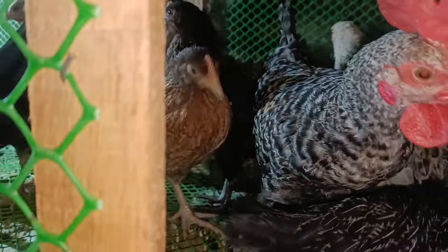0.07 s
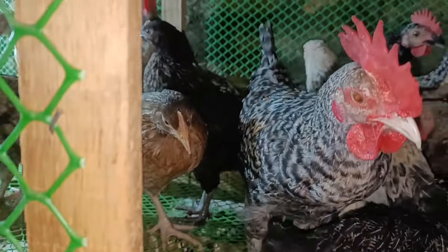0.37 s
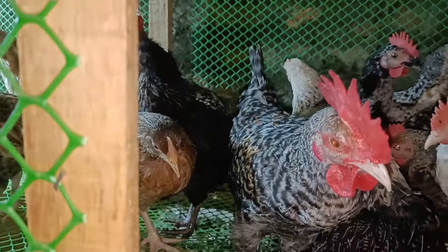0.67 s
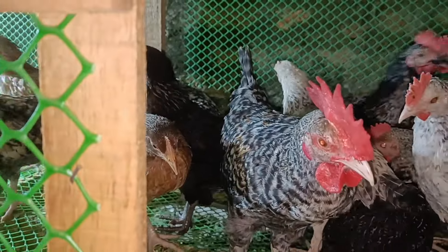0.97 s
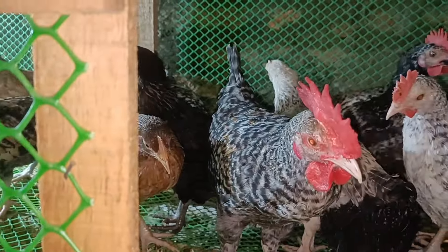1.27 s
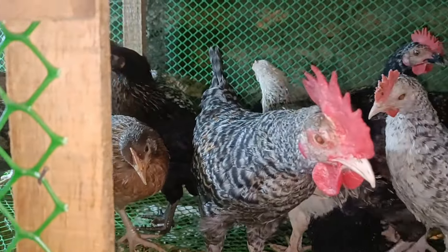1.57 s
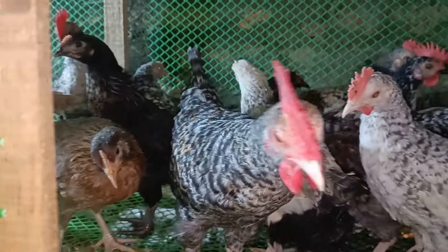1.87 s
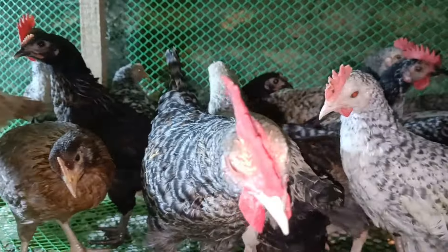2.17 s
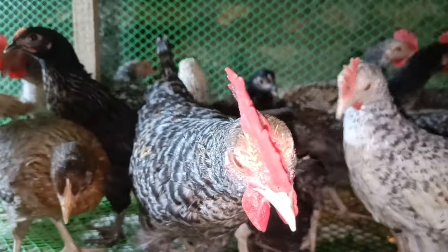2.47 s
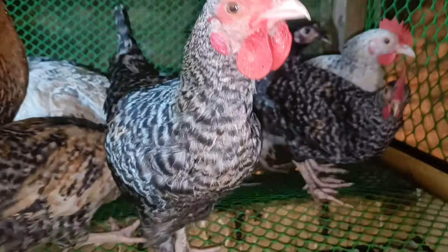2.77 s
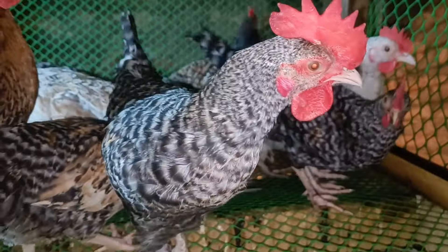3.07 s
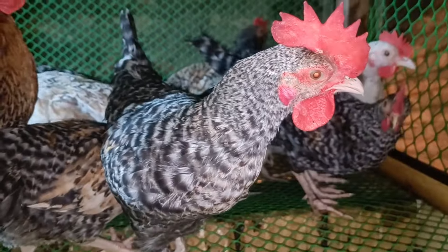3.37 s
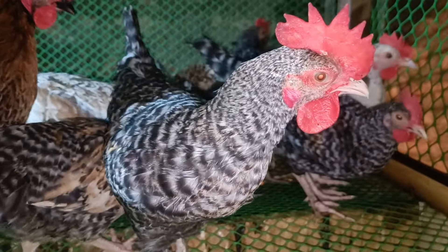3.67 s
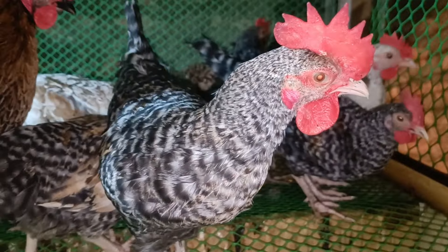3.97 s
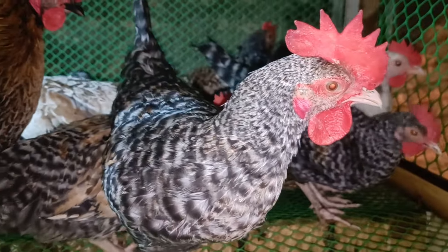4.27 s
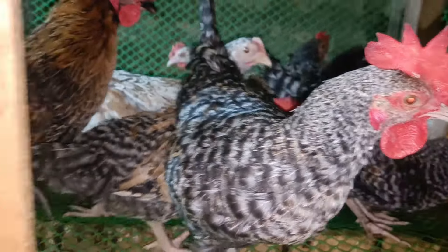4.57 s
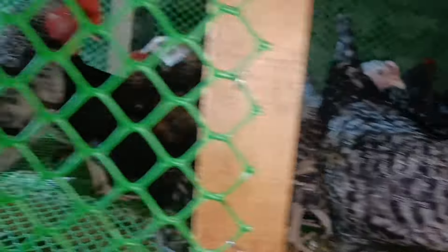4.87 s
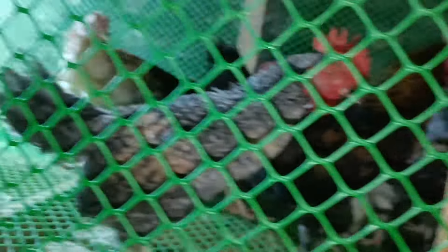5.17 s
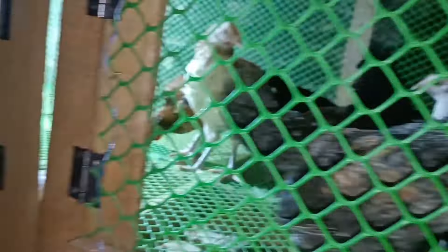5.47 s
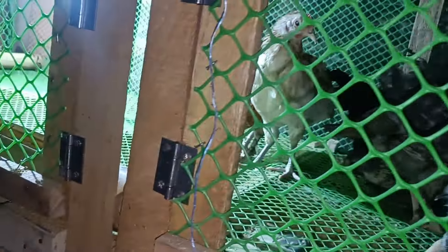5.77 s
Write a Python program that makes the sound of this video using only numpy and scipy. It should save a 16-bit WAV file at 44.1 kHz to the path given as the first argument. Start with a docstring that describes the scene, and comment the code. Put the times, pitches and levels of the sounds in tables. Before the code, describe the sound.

In a small, crowded coop, a chicken close to the microphone gives a loud squawk in three parts: a short note, a long held one and a raspy ending. Young birds then keep up quieter falling peeps and hoarse chirrs, while a hen briefly clucks and croons low. Feet shuffle and claws scratch faintly. In the last couple of seconds, a few sharp knocks hit the wooden frame.

```python
"""A crowded chicken coop

One bird gives a loud three-part squawk: pulses from its syrinx, filtered by windpipe and beak.
Young birds keep up falling whistled peeps and hoarse chirrs while one hen croons and another clucks.
Feet scuffle, claws scrape the plastic mesh, and sharp knocks set the wooden frame ringing.
The close boards add dense reflections and a short, dull reverberation."""
import sys
import numpy as np
from scipy import signal
from scipy.fft import rfft, irfft, next_fast_len
from scipy.io import wavfile
from scipy.ndimage import uniform_filter1d, map_coordinates

SR = 44100
rng = np.random.default_rng(int(sys.argv[2]) if len(sys.argv) > 2 else 0)


def file_out(sig):
    """Save sig as 16-bit WAV at sys.argv[1]."""
    # one column per channel
    cols = np.atleast_2d(sig).T
    # limit, then scale
    lim = np.clip(cols, -1, 1)
    pcm = np.round(lim * 32767).astype(np.int16)
    wavfile.write(sys.argv[1], SR, pcm)


N = 265217
TIME = np.arange(N) / SR

# Resonances of windpipe and beak. Each row: frequency in Hz, gain in dB.
VOCAL_TRACT = [(250, -39.5), (370, -11), (520, -15), (750, 0.5), (1100, 4), (1500, -11.5), (1900, 5),
               (2280, 0.5), (2650, -6), (3050, -12), (3400, -23.5), (3800, -17.5), (4700, -29), (5400, -19),
               (6600, -10.5), (7500, -20.5), (8400, -39.5), (9200, -31.5), (10300, -38.5), (11800, -27),
               (13500, -31.5), (15500, -29.5)]
# Syllables of the squawk. Each row: start and end in seconds, period doubling and rasp from 0 to 1.
SQUAWK_SYLLABLES = [(0.111, 0.26, .02, .03), (.335, 0.886, 0.07, 0.19), (0.899, 1.1, 0.81, 0.7)]
# Pitch contours, one list a syllable. Each row: time in seconds, fundamental in Hz.
SYLLABLE_PITCH = [
    [(0.118, 748.3), (0.134, 743), (0.166, 781), (0.194, 758), (0.216, 685.3), (0.255, 690.5)],
    [(0.35, 753), (0.4, 766.6), (0.62, 732.5), (0.706, 735), (0.802, 752.3), (0.834, 738.4), (0.86, 749)],
    [(0.92, 664.7), (0.944, 711.3), (0.988, 743.6), (0.994, 702), (1.002, 664.6), (1.034, 639),
     (1.064, 600), (1.07, 604)],
]
# Effort, one list a syllable. Each row: time in seconds, relative throat, beak and edge levels in dB.
SYLLABLE_EFFORT = [
    [(0.1, -66, -41, -68), (0.11, -48, -27, -45.5), (0.122, -18.5, -18, -31.5), (0.146, -24.5, -13, -33.5),
     (0.162, -18, -13.5, -41), (0.18, -18.5, -15, -41), (0.192, -22.5, -16, -34), (0.222, -29, -16, -47.5),
     (0.252, -28.5, -29.5, -59), (0.262, -36, -38, -64.5), (0.274, -62, -47, -70), (0.3, -39, -43, -78.5)],
    [(0.33, -52, -39.5, -62), (0.348, -19, -19.5, -34), (0.39, -23.5, -17.5, -36), (0.408, -16, -18, -34),
     (0.47, -32.5, -14.5, -37), (0.498, -16, -19.5, -37.5), (0.602, -22, -25, -35),
     (0.688, -23.5, -27.5, -26.5), (0.74, -20, -31, -27.5), (0.778, -24, -19.5, -34.5),
     (0.832, -26, -22.5, -39), (0.89, -54, -37, -64)],
    [(0.9, -55, -29, -56), (0.912, -58, -32, -49.5), (0.92, -33, -30.5, -40), (0.936, -26.5, -21, -34.5),
     (1.006, -27, -25, -45), (1.028, -38, -24, -62), (1.04, -24.5, -27.5, -55), (1.046, -47, -26.5, -69),
     (1.06, -30.5, -45, -64), (1.082, -49, -44, -64), (1.1, -48.5, -75, -78)],
]
# Nearby peeps. Each row: start and length in seconds, first and last pitch in Hz, relative level in dB.
NEAR_PEEPS = [(1.151, 0.15, 4483, 3490, -38), (1.231, 0.048, 4440, 2070, -42),
              (1.571, 0.025, 2790, 1473, -28), (1.631, 0.047, 2346, 1746, -38.5),
              (1.838, 0.054, 2900, 1800, -38), (1.852, 0.21, 4176, 2770, -38.5),
              (2.023, 0.089, 3840, 2560, -35), (2.028, 0.024, 2314, 1370, -44),
              (2.05, 0.2, 3790, 2835, -35), (2.113, 0.086, 4600, 1950, -31),
              (2.242, 0.058, 2603, 2112, -31), (2.323, 0.032, 4330, 3135, -28.5),
              (2.335, .076, 2936, 2280, -36.5), (2.431, 0.19, 4733, 3150, -33.5),
              (2.48, 0.15, 3220, 3080, -43), (2.476, 0.095, 3940, 2840, -34),
              (2.567, 0.044, 2600, 1240, -36.5), (2.761, 0.009, 4026, 4140, -24.5),
              (2.788, 0.15, 3970, 3550, -41), (2.882, .11, 4570, 2480, -41),
              (3.019, 0.13, 5360, 4560, -47.5), (3.06, .13, 4655, 2504, -44),
              (3.229, 0.29, 4524, 3960, -38), (3.312, 0.082, 3684, 2860, -35.5),
              (3.37, .036, 2667, 1736, -34), (3.48, 0.24, 4155, 3741, -37.5),
              (3.694, 0.042, 3390, 1560, -45), (3.763, 0.22, 4710, 4510, -38),
              (3.87, 0.038, 3857, 1887, -31.5), (4.021, .11, 4620, 2610, -46.5),
              (4.126, 0.023, 2130, 1450, -31.5), (4.216, 0.03, 3660, 2290, -47),
              (4.289, .12, 3313, 2960, -38.5), (4.29, 0.31, 4080, 4046, -35.5),
              (4.433, 0.099, 4870, 3990, -38), (4.438, 0.059, 3980, 2184, -43.5),
              (4.522, 0.068, 3724, 1396, -32.5), (4.594, 0.042, 4000, 3340, -36.5),
              (4.743, 0.085, 4470, 3080, -41), (4.892, .12, 5390, 4430, -41.5),
              (4.924, .14, 4500, 4380, -36), (5.059, .13, 4265, 4034, -30.5),
              (5.136, 0.025, 2276, 1350, -39), (5.157, 0.055, 4100, 3357, -32.5),
              (5.418, 0.016, 2180, 1310, -32.5), (5.547, 0.1, 4690, 4220, -33.5),
              (5.633, .18, 4090, 4126, -36), (5.809, 0.12, 3786, 3080, -37.5),
              (5.962, 0.023, 1823, 1450, -39)]
# Short peeps plunge ever faster, long ones level out. Each row: length in seconds, glide exponent.
GLIDE_SHAPE = [(.03, 1.15), (.11, 1.5), (.26, .7)]
# Higher voices stand to the right. Each row: last pitch in Hz, left minus right level in dB.
PAN_BY_PITCH = [(1500, 0), (3400, -4)]
# Hoarse calls. Each row: start and length in seconds, first pitch, last pitch and jitter in Hz,
# level in dB.
CHIRR_CALLS = [(2.71, 0.018, 1600, 1420, 246, -44), (3.095, 0.11, 1670, 1616, 130, -52),
               (3.502, 0.12, 5250, 5130, 250, -44.5), (3.631, 0.25, 5430, 4850, 254, -43.5),
               (3.717, .19, 4360, 3613, 510, -35.5), (3.873, .05, 2500, 1730, 397, -56),
               (4.352, 0.052, 2290, 1925, 239, -40), (5.386, 0.1, 4276, 3410, 557, -38.5)]
# Envelope of the croon. Each row: time in seconds, levels of fundamental and octave in dB.
CROON_LEVELS = [(1.3, -59, -64), (1.614, -50.5, -44.5), (1.674, -53, -69), (1.778, -55, -46.5),
                (1.99, -39, -46), (2.474, -63, -63), (2.746, -53, -57), (2.85, -78, -78)]
# Low clucks. Each row: start and length in seconds, first and last pitch in Hz, level in dB.
CLUCK_CALLS = [(1.367, 0.038, 226, 185, -43), (1.442, 0.085, 263.5, 235.6, -38),
               (1.629, 0.081, 271.5, 280, -44), (2.263, 0.061, 294.5, 264, -45.5)]
# Formants of the clucking hen. Each row: frequency in Hz, gain in dB.
CLUCK_FORMANTS = [(200, 5.5), (480, 17.5), (750, 4.5), (1000, 13.5), (1400, -9), (1800, 13.5), (3000, -65),
                  (8000, -50)]
# Beaks or feet striking the frame. Each row: start in seconds, relative level in dB,
# weight of the ring in half-dB steps, left minus right level in dB.
FRAME_KNOCKS = [(3.842, -30.5, -8.5, 2), (4.707, -26.5, -30, -5), (4.723, -20.5, -20, 0),
                (5.067, -13, -39, -3.5), (5.587, -11, -9, -3.5), (5.597, -36, -14, -10),
                (5.881, -12, -53, -0.5)]
# Modes of the wooden frame. Each row: frequency in Hz, relative level in dB, 60 dB decay in seconds.
FRAME_MODES = [(535, 10.5, 0.23), (800, -38, 0.038), (1135, -35, 0.039), (1490, -22, .09),
               (2160, -2.5, 0.12), (2340, 0, .07), (4640, -4, 0.063), (6030, -12, .04), (7270, -14, .05)]
# Noise of an impact. Each row: frequency in Hz, gain in dB.
CRACK_SPECTRUM = [(150, -30), (400, -2.5), (900, -1.5), (1500, 0), (2400, 4), (3500, -3.5), (5000, -5.5),
                  (6800, -2), (8200, -24), (11000, -22), (15500, -25)]
# Claws on the mesh. Each row: start and length in seconds, level in dB.
CLAW_SCRAPES = [(0.023, 0.0061, -41), (2.259, 0.024, -39), (2.762, 0.02, -29.5), (3.523, 0.053, -47.5),
                (5.405, 0.029, -52.5), (5.543, 0.0072, -35.5)]
# Friction noise of a claw. Each row: frequency in Hz, gain in dB.
SCRAPE_SPECTRUM = [(500, -20), (2000, -3), (4000, -5), (6000, 10.5), (8000, -7.5), (11000, -4.5),
                   (15500, -19)]
# Soft steps on the floor. Each row: start in seconds, frequency in Hz, level in dB.
FLOOR_STEPS = [(2.332, 114, -38), (2.652, 137, -32.5)]
# Restlessness of the flock. Each row: time in seconds, relative levels in dB of feet, litter and the high hiss
# of distant peeping.
BUSTLE_LEVELS = [(1.1, -50.5, -64, -67), (1.39, -54, -54, -78), (1.64, -50.5, -51.5, -66),
                 (2.03, -49, -55.5, -56), (2.29, -51.5, -59.5, -60), (2.65, -49, -49.5, -60.5),
                 (2.93, -59, -59, -64.5), (3.58, -57, -62, -68), (3.72, -58.5, -64, -67),
                 (3.97, -58, -53.5, -65.5), (4.31, -58.5, -67, -72), (5.28, -56.5, -56.5, -65),
                 (5.79, -58.5, -62.5, -60.5), (6.0, -57, -55, -77)]
# Noise of feet, litter and the high hiss of distant peeping. Each row: frequency in Hz, gain in dB.
FEET_SPECTRUM = [(15, -24), (25, -8.5), (86, -6), (156, 0.5), (213, 3), (236, -9.5), (327, -1.5),
                 (441, -18.5), (500, -12), (650, -9), (1100, -120)]
LITTER_SPECTRUM = [(250, 1), (400, 2.5), (900, 1.5), (1700, -2.5), (2600, 3), (4000, -65)]
PEEP_HISS_SPECTRUM = [(3000, -15), (5000, 13), (6800, 17), (8200, -22.5), (11000, 4.5), (15500, -4.5)]
# Chatter of the birds further back. Each row: time in seconds, relative level in dB.
CHATTER_LEVELS = [(1.1, -40), (1.41, -34), (1.9, -37.5), (2.05, -31), (2.19, -40), (2.68, -33.5),
                  (2.93, -56.5), (3.17, -36), (3.45, -45.5), (3.79, -44.5), (4.05, -43), (4.32, -39.5),
                  (4.48, -41), (4.77, -41.5), (5.0, -44), (5.37, -39), (5.73, -41.5), (6.0, -35.5)]


def squawk(throat_db=2.5, beak_db=2, edge_db=3, shudder_db=4.5, shudder_hz=27, flutter_db=5):
    """Source and filter: the tract shapes the syrinx pulses; three bands swell as the beak opens."""
    t = TIME[:int(1.12 * SR)]
    doubling, rasp = strain(t)
    voice = colour(syrinx(t, doubling, rasp), VOCAL_TRACT)
    from_middle = t - .535  # the overtones shudder midway through the held note
    shudder = shudder_db * swell(from_middle / .13 + .5, .067)
    shudder *= np.cos(2 * np.pi * shudder_hz * from_middle)
    bands = [(200, 1250, throat_db), (1250, 4700, beak_db + shudder), (4700, 17000, edge_db + shudder)]
    call = 0
    for (low_hz, high_hz, band_db), effort_db in zip(bands, curves(np.vstack(SYLLABLE_EFFORT), t)):
        band = signal.sosfiltfilt(signal.butter(5, (low_hz, high_hz), "band", fs=SR, output="sos"), voice)
        envelope = np.sqrt(uniform_filter1d(band ** 2, size=500) + 1e-12)
        call += band / envelope * from_db(effort_db + band_db)
    call *= from_db(flutter_db * np.sqrt(rasp) * np.tanh(drift(71.7, len(t))))
    onset = SYLLABLE_EFFORT[0][0][0]
    call *= swell((t - onset) / (t[-1] - onset), .0078)
    fading_note = np.sin(2 * np.pi * 760 * t) * decay(t, -31.5, t60=.29)  # dies away as the call begins
    return np.pad(call + fading_note, (0, N - len(t)))


def strain(t, catch_s=.014, fray_s=.077):
    """Strain upsets the vibration: period doubling and rasp at each onset, rasp again at each end."""
    doubling, rasp = np.zeros((2, len(t)))
    for start, end, own_doubling, own_rasp in SQUAWK_SYLLABLES:
        catch = np.exp(-np.maximum(t - start, 0) / catch_s)
        fray = np.exp(-np.maximum(end - t, 0) / fray_s)
        doubling = np.where(t < start, doubling, own_doubling + .57 * catch)
        rasp = np.where(t < start, rasp, own_rasp + catch + .6 * fray)
    return np.clip(doubling, 0, 1), np.clip(rasp, 0, 1)


def syrinx(t, doubling, rasp, skew=.28, unevenness=.84, jitter=.035, wobble=.002, breath=.22):
    """Period doubling: every second pulse comes late and weak, adding lines between the harmonics."""
    hz, = curves(np.vstack(SYLLABLE_PITCH), t)
    doubling = doubling * from_db(4 * (2 - doubling) * drift(40, len(t)))  # comes and goes in patches
    detune = (jitter * rasp + .0007) * drift(330, len(t)) + wobble * drift(60, len(t))
    phase = phase_of(hz * (1 + detune))
    alternation = doubling * np.cos(phase / 2)
    skewed = phase + skew * alternation
    # the windpipe smears each pulse: high partials arrive later
    pulses = unit_rms(sum(np.cos(k * skewed - k * k / np.pi) for k in range(1, 24)))
    air = breath * rasp * (1 + np.cos(phase)) * rng.standard_normal(len(t))
    return pulses * (1 + unevenness * alternation) + air


def board_echo(call, delays_s=(.0112, .0061), echo_db=-7):
    """Interference: on each side a reflection off the boards beats with the call as its pitch moves."""
    echo = np.array([np.interp(TIME - delay, TIME, call) for delay in delays_s])
    return place(call, pan_db=4.5, lead_s=.0001) + from_db(echo_db) * echo


def peep(length, start_hz, end_hz, db, waver=.01, second_db=-29, third_db=-32):
    """A gliding whistle; random frequency modulation turns it hoarse below 3.3 kHz."""
    u = np.linspace(0, 1, max(int(length * SR), 64))
    exponent, = curves(GLIDE_SHAPE, length)
    hz = start_hz + (end_hz - start_hz) * u ** exponent
    hoarseness = .063 * np.interp(hz, [1800, 3300], [1, 0])
    phase = phase_of(hz * (1 + waver * drift(220.9, len(u)) + hoarseness * drift(586, len(u))))
    # deeper falls carry stronger overtones
    brightness = np.clip(4 * (1 - end_hz / start_hz), .15, 1) * from_db(5 * drift(60, len(u)))
    overtones = from_db(second_db) * np.sin(2 * phase) + from_db(third_db) * np.sin(3 * phase)
    tone = np.sin(phase) + brightness * overtones
    level = from_db(db + 3.75 - 1.5 * u + 2 * drift(103, len(u)))
    return np.sqrt(2) * tone * level * swell(u, np.where(u < .5, .25, .12))


def near_peeps(gain_db=-2, break_hz=2200, pitch_spread=.08):
    """Young birds whistle close by; in the deepest glides the vibration breaks into a chirr."""
    out = np.zeros((2, N))
    for start, length, start_hz, end_hz, db in NEAR_PEEPS:
        pan_db, = curves(PAN_BY_PITCH, end_hz)
        lead_s = -.0001 + .0002574 * rng.normal()
        add(out, start, place(peep(length, start_hz, end_hz, db), pan_db, lead_s))
        if end_hz < break_hz:
            tuning = 1 + pitch_spread * rng.uniform(-1.004, 1)  # varies from bird to bird
            voice_break = chirr(.04864, tuning * 2410, tuning * 1858, jitter_hz=319, db=db - 9)
            add(out, start + length - .04, place(voice_break, pan_db, lead_s))
    return from_db(gain_db) * out


def chirr(length, start_hz, end_hz, jitter_hz, db, grain_db=5):
    """Irregular vibration of the syrinx spreads a whistle into a band; shrill ones carry an octave."""
    u = np.linspace(0, 1, int(length * SR))
    phase = phase_of(np.interp(u, [0, 1], [start_hz, end_hz]) + jitter_hz * drift(1200, len(u)))
    octave_db = np.interp(start_hz, [4400, 5300], [-29, -13])
    tone = np.sin(phase) + from_db(octave_db) * np.sin(2 * phase)
    return tone * from_db(db + grain_db * drift(293, len(u))) * swell(u, .2)


def chirrs(spread_s=.00027):
    """Hoarse calls, scattered in direction by their arrival times at the two sides."""
    out = np.zeros((2, N))
    for start, *call in CHIRR_CALLS:
        add(out, start, place(chirr(*call), lead_s=spread_s * rng.normal()))
    return out


def croon(pitch_hz=296, sag_hz_per_s=7.5, flutter_db=2):
    """A hen's closed-beak tone holds only a fundamental and its octave, sagging slowly in pitch."""
    start, end = CROON_LEVELS[0][0], CROON_LEVELS[-1][0]
    hz = pitch_hz - sag_hz_per_s * (TIME - start)
    phase = phase_of(hz * (1 + .0093 * drift(35, N)))
    first_db, octave_db = curves(CROON_LEVELS)
    tone = np.sqrt(2) * (from_db(first_db) * np.sin(phase) + from_db(octave_db) * np.sin(2 * phase))
    envelope = from_db(flutter_db * drift(28, N)) * swell((TIME - start) / (end - start), .025)
    return place(tone * envelope)


def clucks(jitter=.059):
    """Short, irregular pulse trains excite the formants of a hen's throat."""
    out = np.zeros((2, N))
    for start, length, start_hz, end_hz, db in CLUCK_CALLS:
        u = np.linspace(0, 1, int(length * SR))
        phase = phase_of(np.interp(u, [0, 1], [start_hz, end_hz]) * (1 + jitter * drift(272, len(u))))
        pulses = sum(np.cos(k * phase) for k in range(1, 16))
        voice = unit_rms(colour(pulses, CLUCK_FORMANTS))
        add(out, start, place(from_db(db) * voice * swell(u, .4)))
    return out


def knocks(crack_db=-7, rattle_db=-19, ring_db=-24):
    """An impact gives a broadband crack, rattles the mesh and excites the damped modes of the frame."""
    out, t = np.zeros((2, N)), TIME[:SR // 4]
    for start, db, ring_weight, pan_db in FRAME_KNOCKS:
        noise = stereo_noise(CRACK_SPECTRUM, correlation=.13, size=len(t))
        hit = noise * (decay(t, crack_db, t60=.038) + decay(t, rattle_db, t60=.17))
        for hz, mode_db, t60 in FRAME_MODES:
            mode = decay(t, ring_db + mode_db + ring_weight / 2, t60) * np.sin(2 * np.pi * hz * t)
            hit += rng.normal(0, 1, (2, 1)) * mode
        add(out, start, hit * from_db(db + np.array([[pan_db], [-pan_db]]) / 2))
    return out


def scrapes(grain_db=5.5):
    """Friction: claws slip over the mesh in grainy bursts of noise."""
    out = np.zeros((2, N))
    for start, length, db in CLAW_SCRAPES:
        u = np.linspace(0, 1, int(length * SR))
        noise = stereo_noise(SCRAPE_SPECTRUM, correlation=.086, size=len(u))
        grains = unit_rms(noise * from_db(grain_db * drift(500, len(u))))
        add(out, start, from_db(db) * grains * swell(u, .142))
    return out


def footfalls(t60=.23):
    """Each step sets the floor into a low, damped vibration."""
    out, t = np.zeros((2, N)), TIME[:SR // 4]
    for start, hz, db in FLOOR_STEPS:
        phase = phase_of(hz * (1 + .11 * drift(76, len(t))))
        thud = np.sin(phase) * decay(t, db, t60) * swell(t / t[-1], .029)
        add(out, start, place(thud))
    return out


def far_peeps(count=240, overtone_db=-13):
    """Random whistles superpose into chatter; higher ones are fainter, shorter ones fall further."""
    out = np.zeros((2, N))
    for k, (offset, duration, height, side, distance) in enumerate(rng.random((count, 5))):
        top_hz = 3200 * 1.85 ** height
        fall = np.interp(duration, [0, 1], [.45, .12])
        db = -4 * height ** 2 - 6 * distance
        call = peep(.05 + .1 * duration, top_hz, top_hz * (1 - fall), db,
                    waver=.01255, second_db=overtone_db)
        start = (k + offset) / count * TIME[-1]
        add(out, start, place(call, pan_db=10 * (side - .5), lead_s=.00054 * (side - .5)))
    return unit_rms(out)


def flock(hush_db=-8, direct_db=-7):
    """Feet, litter, the high hiss of distant peeping and far voices add incoherently; all are quieter during
    the squawk."""
    feet_db, litter_db, hiss_db = curves(BUSTLE_LEVELS)
    feet = from_db(feet_db) * stereo_noise(FEET_SPECTRUM, correlation=.92)
    litter_db += 1 + 2.5 * drift(35, N)  # treading
    litter = from_db(litter_db) * stereo_noise(LITTER_SPECTRUM, correlation=.18)
    hiss_db += 4.5 + 3.2 * drift(120, N) + 3.5 * drift(20, N)  # the high hiss of distant peeping comes and goes
    hiss = from_db(hiss_db) * stereo_noise(PEEP_HISS_SPECTRUM, correlation=.05)
    far = far_peeps()
    chatter_db, = curves(CHATTER_LEVELS)
    chatter = from_db(chatter_db - 1) * unit_rms(coop(far) + from_db(direct_db) * far)
    hush = from_db(np.interp(TIME, [.9, 1.25], [hush_db, 0]))
    return (feet + litter + hiss + chatter) * hush


def coop(x, early_t60=.1, tail_t60=.29, tail_db=-10):
    """Reverberation: dense early reflections off the close boards, then a short, dull tail."""
    t = TIME[:SR // 2]
    envelope = (decay(t, 0, early_t60) + decay(t, tail_db, tail_t60)) * (t > .002)
    spectrum = [(100, 0), (700, 16.5), (4500, 18), (7000, 4), (16000, -28.5)]
    response = stereo_noise(spectrum, correlation=0, size=len(t)) * envelope
    response /= np.sqrt(np.sum(response ** 2) / 2)
    return signal.fftconvolve(x, response, axes=1)[:, :N]


def from_db(db):
    """Amplitude ratio of a level in decibels."""
    return 10 ** (np.asarray(db) / 20)


def decay(t, db, t60):
    """Exponential decay from db, losing 60 dB in t60 seconds."""
    return from_db(db - 60 * t / t60)


def unit_rms(x):
    """Normalisation to unit mean power."""
    return x / np.sqrt(np.mean(x ** 2) + 1e-20)


def curves(rows, at=TIME):
    """Linear interpolation of each later column against the first."""
    axis, *columns = np.transpose(rows)
    return [np.interp(at, axis, column) for column in columns]


def colour(x, spectrum, skirt_db_per_octave=16):
    """Filtering by a (Hz, dB) curve that rolls off beyond its ends."""
    size = next_fast_len(x.shape[-1] + 2048)
    octave = np.log2(np.maximum(np.fft.rfftfreq(size, 1 / SR), 1))
    hz, db = np.transpose(spectrum)
    outside = abs(octave - np.clip(octave, np.log2(hz[0]), np.log2(hz[-1])))
    gain = from_db(np.interp(octave, np.log2(hz), db) - skirt_db_per_octave * outside)
    return irfft(rfft(x, size) * gain, size)[..., :x.shape[-1]]


def drift(rate_hz, size):
    """Smooth random modulation with a spread near 1."""
    knots = rng.standard_normal(8192)
    return map_coordinates(knots, [np.arange(size) * rate_hz / SR], order=2, mode="wrap")


def stereo_noise(spectrum, correlation, size=N):
    """Coloured noise, partly coherent between the two sides."""
    mid, side = rng.standard_normal((2, size))
    pair = np.sqrt(1 + correlation) * mid + np.sqrt(1 - correlation) * side * [[1], [-1]]
    return unit_rms(colour(pair, spectrum))


def place(x, pan_db=0, lead_s=0):
    """Localisation: the left side is louder by pan_db and earlier by lead_s."""
    gains = unit_rms(from_db(np.array([[pan_db], [-pan_db]]) / 2))
    delayed = map_coordinates(x, [np.arange(len(x)) - lead_s * SR], order=3)
    return gains * np.array([x, delayed])


def add(out, start_s, x):
    """Superposition of x on out from start_s."""
    i = max(round(start_s * SR), 0)
    out[:, i:i + x.shape[1]] += x[:, :N - i]


def phase_of(hz):
    """Phase is the running integral of frequency."""
    return 2 * np.pi * np.cumsum(hz) / SR


def swell(u, edge):
    """A window over u from 0 to 1, with raised-cosine tapers of width edge."""
    return np.sin(np.pi / 2 * np.clip(np.minimum(u, 1 - u) / edge, 0, 1)) ** 2


def scene(squawk_send_db=-17, young_send_db=-5, others_send_db=-11):
    """The direct sound of the birds and their movements sums with the reverberation of the coop."""
    loud_bird = board_echo(squawk())
    young = near_peeps() + chirrs()
    others = croon() + clucks() + knocks() + scrapes()
    room = coop(from_db(squawk_send_db) * loud_bird + from_db(young_send_db) * young
                + from_db(others_send_db) * others)
    return loud_bird + young + others + footfalls() + room + flock()


def record(dry, ceiling=.9, cutoff_hz=16000):
    """Soft saturation rounds the loudest peaks; a steep low-pass removes the highest treble."""
    rounded = dry / (1 + (dry / ceiling) ** 6) ** (1 / 6)
    return signal.sosfilt(signal.ellip(10, .1, 80, cutoff_hz, fs=SR, output="sos"), rounded)


dry = scene()
out = record(dry)
file_out(out)
```